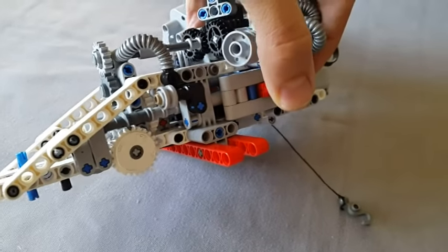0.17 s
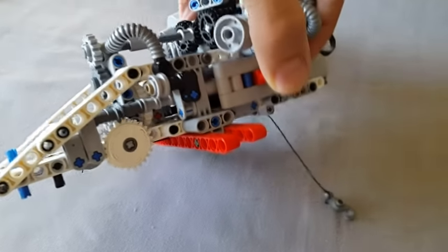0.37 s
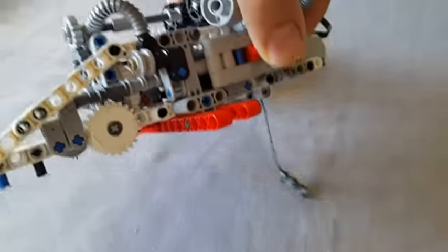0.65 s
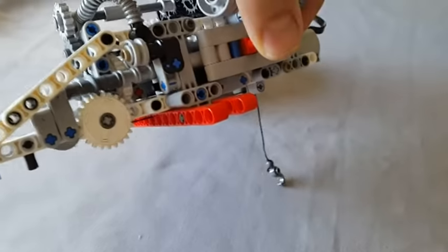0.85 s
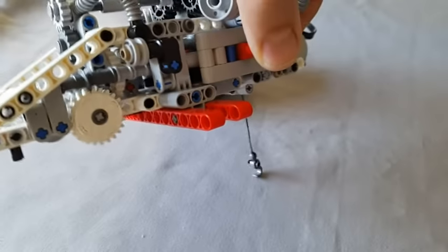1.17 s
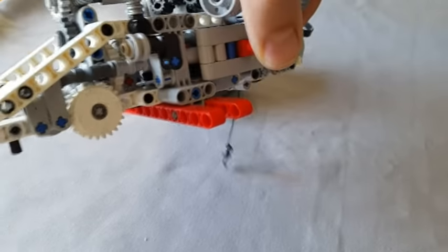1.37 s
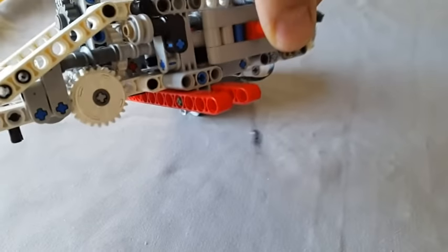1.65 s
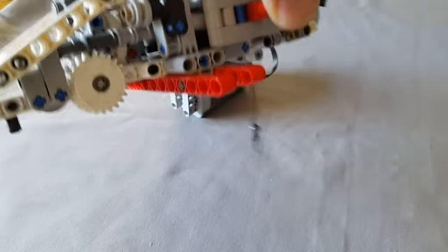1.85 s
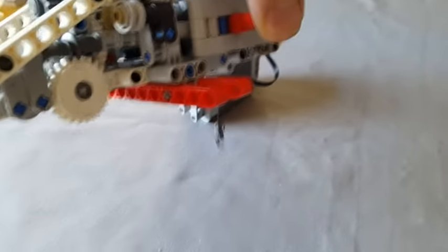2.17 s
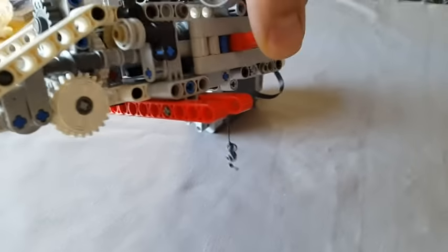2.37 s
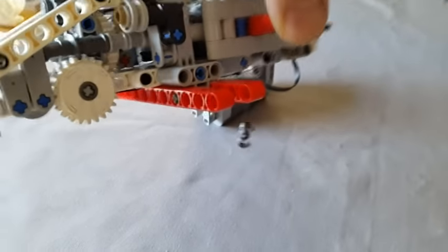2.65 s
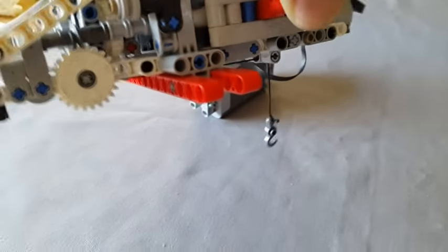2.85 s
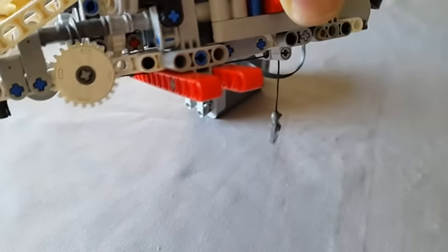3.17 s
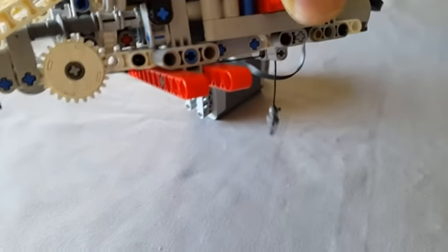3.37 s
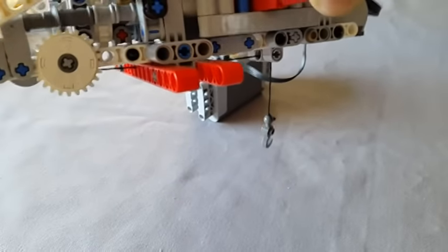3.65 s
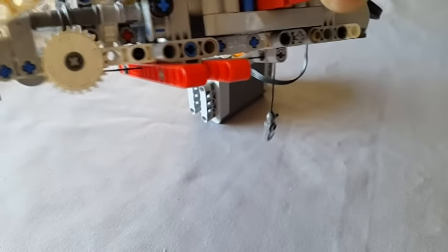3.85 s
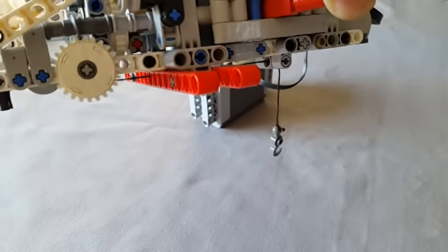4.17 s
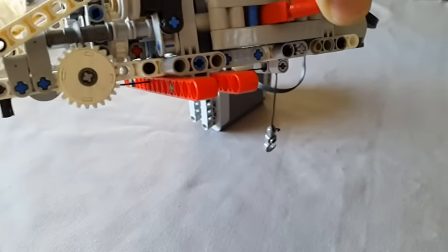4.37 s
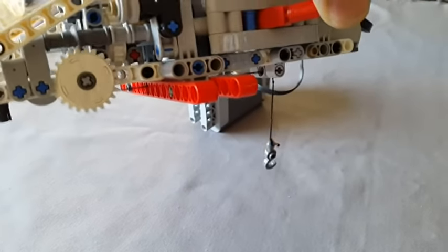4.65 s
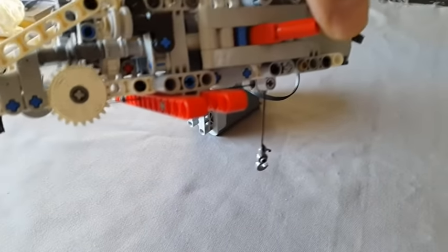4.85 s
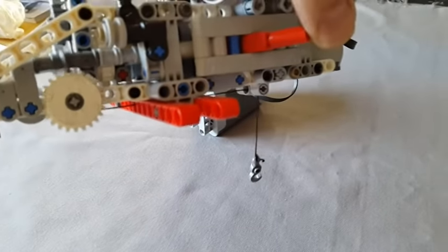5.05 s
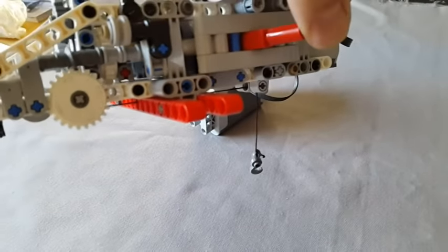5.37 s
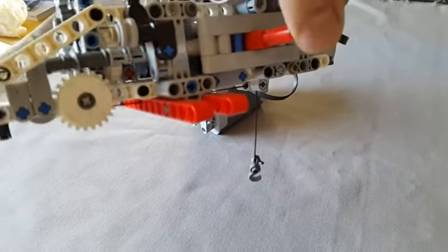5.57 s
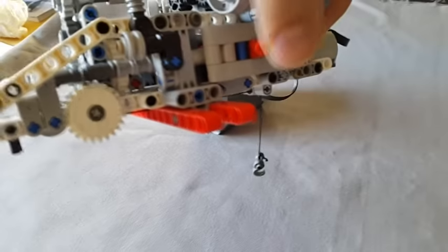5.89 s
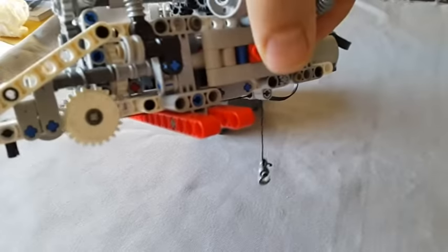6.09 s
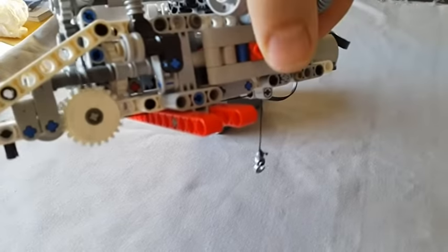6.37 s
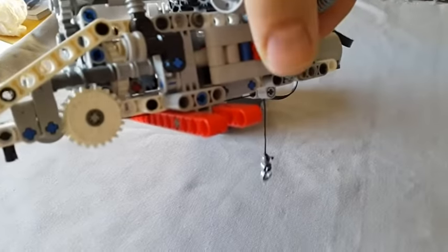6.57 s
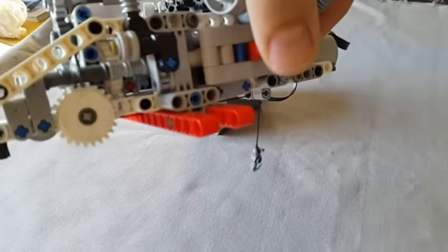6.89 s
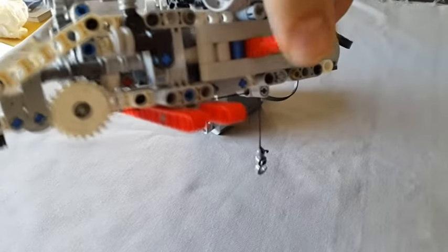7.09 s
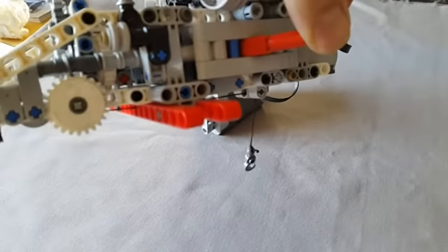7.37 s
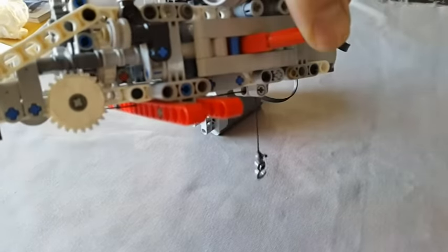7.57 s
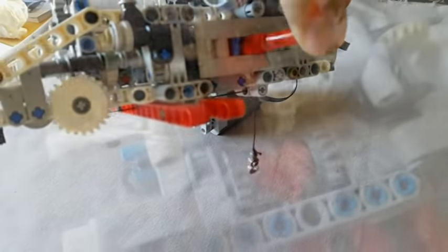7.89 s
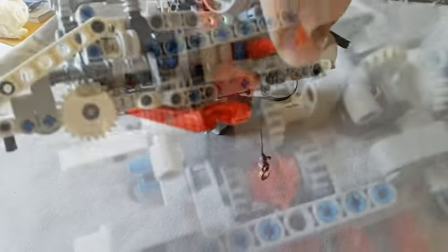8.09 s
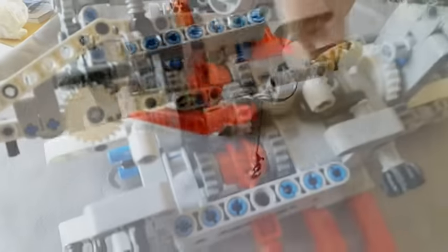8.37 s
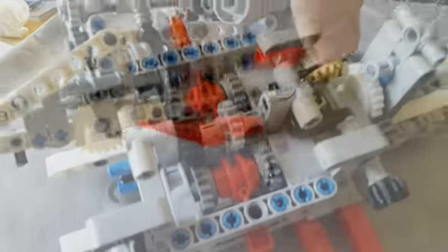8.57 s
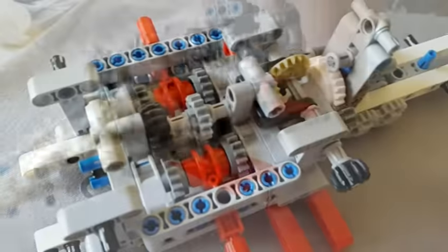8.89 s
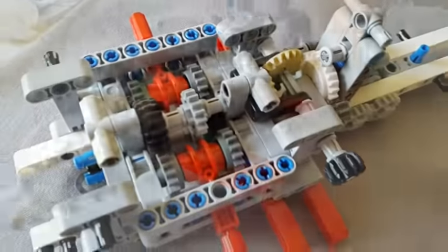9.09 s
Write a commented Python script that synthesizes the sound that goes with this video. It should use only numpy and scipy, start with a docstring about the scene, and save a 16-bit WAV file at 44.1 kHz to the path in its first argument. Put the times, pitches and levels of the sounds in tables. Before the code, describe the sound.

A small electric motor in a hand-held plastic toy crane whines steadily close to the microphone, over a fine rattle and rasp of gears. At first the cable rubs softly as it tightens. The pitch wavers and dips under load, and the gears now and then bind with short, high squeals and small clusters of sharp plastic clicks. The sound fades out at the end, over faint room noise.

```python
"""A small electric motor in a hand-held plastic toy crane winds up a cable, close to the microphone. It whines
at harmonics of its shaft speed, and its brushes tick once a turn. The plastic frame radiates the rattle of the
gears; sliding teeth rasp and the tightening cable rubs. Under load the shaft slows and the gears bind, squeal
and now and then click. Faint room noise and mains hum lie underneath, and the sound fades towards the end."""
import sys
import numpy as np
from scipy import signal
from scipy.fft import rfft, irfft, next_fast_len
from scipy.io import wavfile

SR = 44100
rng = np.random.default_rng(int(sys.argv[2]) if len(sys.argv) > 2 else 0)


def to_wav(sig):
    """Store sig (one row per channel, or 1-D mono) as 16-bit WAV at the path in sys.argv[1].

    Samples outside -1..1 are clipped; the rate is SR.
    """
    pcm = np.clip(np.atleast_2d(sig), -1, 1) * 32767
    pcm = np.round(pcm).astype(np.int16)
    wavfile.write(sys.argv[1], SR, pcm.T)  # frames by channels


N = 407042
TIME = np.arange(N) / SR

# phase between the two microphone ports: (frequency [Hz], lead of the left port [rad])
PORT_PHASE = [(500, 0.5), (1400, 0.5), (2580, 1.04), (3960, -0.5), (5600, 1.14), (7000, 2.5), (9000, 1.5),
              (11200, 1.76), (12300, 2), (13500, 1.5), (15000, 5)]
# moments when the gears bind: (time [s], length [s], slowing [turns/s], binding level [dB])
GEAR_SNAGS = [(0.48, 0.022, 0, -46), (0.76, 0.12, 0, -51), (1.9, 0.08, 0, -46), (2.04, 0.063, 0, -47),
              (2.383, 0.04, 1.36, -47), (2.553, 0.092, 0, -43), (2.728, 0.091, 0.73, -44),
              (2.874, 0.096, 2, -39), (2.982, 0.036, 2.5, -41), (3.634, 0.097, 4.5, -47.5),
              (3.826, 0.09, 6, -42.5), (5.707, 0.072, 6, -39.5), (5.836, 0.039, 2, -40),
              (6.02, 0.086, 2.5, -42.5), (6.16, 0.0549, 2.5, -41.5), (6.22, 0.08, 3, -40),
              (6.355, 0.11, 1.44, -42), (7.32, 0.083, 1.5, -39.5), (7.474, 0.11, 5, -40.5),
              (7.622, 0.085, 3, -45), (8.121, 0.082, 6, -41.5), (8.279, 0.066, 1.5, -42.5)]
# gain as the toy is brought up to the microphone: (time [s], level [dB])
NEARNESS = [(0, -1.5), (1.5, -2), (2.7, -1.8), (3.2, 0.1), (5.2, 0.26), (6.7, -0.6), (7.4, 0.5),
            (8.1, -0.1), (8.8, -1)]


def amp(db):
    """Amplitude ratio of a level in decibels."""
    return 10 ** (np.asarray(db) / 20)


def unit_rms(x):
    """Normalisation to a mean power of 1."""
    return x / np.sqrt(np.mean(abs(x) ** 2) + 1e-20)


def over_time(rows, column=1):
    """Linear interpolation of a time table at every sample."""
    rows = np.asarray(rows)
    return np.interp(TIME, rows[:, 0], rows[:, column])


def at_hz(rows, hz, column=1):
    """Interpolation of a frequency table on a logarithmic axis."""
    rows = np.asarray(rows)
    return np.interp(np.log(hz + 1), np.log(rows[:, 0] + 1), rows[:, column])


def waver(rate_hz):
    """Random modulation: noise of rms 1, low-passed at about rate_hz."""
    size = 16384
    hz = np.fft.rfftfreq(size, TIME[-1] / size)
    slow = irfft(rfft(rng.standard_normal(size)) / (1 + (hz / rate_hz) ** 2))
    return unit_rms(np.interp(TIME, np.linspace(0, TIME[-1], size), slow))


def resonance(hz, centre_hz, half_width_hz):
    """Lorentzian resonance curve, 1 at its centre."""
    return 1 / (1 + ((hz - centre_hz) / half_width_hz) ** 2)


def swell(at_s, length_s, steepness):
    """Gaussian envelope around one moment, 1 at its top."""
    return np.exp(-np.minimum((steepness * (TIME - at_s) / length_s) ** 2, 50))


def fade(start_s=7.58, end_s=9.52):
    """Linear amplitude ramp of the closing fade-out."""
    return np.clip((end_s - TIME) / (end_s - start_s), 0.02, 1)


def ports(pair, gain):
    """Partial coherence: two unrelated signals blend at the microphone ports, coloured by gain(hz)."""
    # likeness of the two ports: (frequency [Hz], coherence [0-1])
    port_coherence = [(40, 0.95), (130, .15), (290, 0.18), (640, 0.74), (1400, 0.75), (3000, 0.27),
                      (7000, 0.19), (15000, 0.18)]
    size = next_fast_len(N)
    hz = np.fft.rfftfreq(size, 1 / SR)
    left, unrelated = rfft(pair, size)
    coherence = np.clip(at_hz(port_coherence, hz), 0, 1)
    blend = coherence * left + np.sqrt(1 - coherence ** 2) * unrelated
    right = blend * np.exp(-1j * at_hz(PORT_PHASE, hz))
    return irfft(np.array([left, right]) * gain(hz), size)[:, :N]


def frame(vibration, low_hz, high_hz):
    """Structural radiation: the plastic frame colours one band of vibration; the result has rms 1."""
    # radiation of the frame: (frequency [Hz], left level [dB], right level [dB])
    radiation = [(350, -20.5, -62), (615, -25.5, -26.5), (917, -18.5, -20), (1420, -13, -10.5),
                 (1950, -6, -5), (2550, -4.5, -11), (2790, -9.5, -15.5), (3080, -8, -9.5),
                 (4250, -7.5, -2.5), (5380, -6, -4.5), (5710, -8.5, 2), (6400, -5.5, -13), (7570, -10, -15),
                 (8000, -15, -15), (9850, -15, -20.5), (12200, -20, -19.5), (16400, -16, -21)]

    def gain(hz):
        band_loss = np.sqrt((1 + (low_hz / (hz + 1)) ** 16) * (1 + (hz / high_hz) ** 16))
        return amp([at_hz(radiation, hz), at_hz(radiation, hz, column=2)]) / band_loss
    return unit_rms(ports(vibration, gain))


def shaft_pace():
    """Load torque slows a motor: the shaft speed [turns/s] follows the load and sags at snags."""
    # pace under the slowly changing load: (time [s], speed [turns/s])
    pace = [(0.0, 155.3), (0.35, 155.5), (0.48, 148.9), (0.84, 148.3), (1.34, 151.8), (1.62, 151.3),
            (1.85, 145.9), (2.05, 146.4), (2.33, 152.4), (2.63, 144.2), (2.96, 147.2), (3.09, 153.8),
            (3.39, 155.3), (4.26, 152.6), (5.5, 155.1), (5.6, 151.2), (6.31, 148.3), (6.68, 152.1),
            (7.15, 155.2), (7.42, 148.8), (7.96, 154.4), (8.04, 152.0), (8.38, 149.2), (8.57, 155.4),
            (9.2, 157.2)]
    sag = sum(slowing * swell(at_s, length_s, steepness=1.5) for at_s, length_s, slowing, _ in GEAR_SNAGS)
    return over_time(pace) - sag


def straining(speed, free_hz=154.2, strained_hz=145.9):
    """Speed droop shows how hard the motor works: 0 running free, 1 straining, 1.3 at most."""
    return np.clip((free_hz - speed) / (free_hz - strained_hz), 0, 1.3)


def tautness():
    """Tension builds as the cable takes up the weight of the hook: 0 slack, 1 carrying it."""
    # tension of the cable: (time [s], tautness [0-1])
    tension = [(0, 0.02), (.36, 0.1), (.6, 0.53), (1.0, 1), (8.2, 1), (8.7, 0.96)]
    return np.clip(over_time(tension), 0, 1)


def binding():
    """Power summation of the snags gives the strength with which the gears bind, as a gain."""
    return np.sqrt(sum((amp(db) * swell(at_s, length_s, steepness=2.3)) ** 2
                       for at_s, length_s, _, db in GEAR_SNAGS))


def partial(cycles, hz, pan_db, rough, rough_hz, drift_db):
    """Modulation: a tone flutters with the play of the gears and drifts sideways as the hand moves."""
    flutter = (1 + rough * (waver(rough_hz) + 1j * waver(rough_hz))) / np.sqrt(1 + 2 * rough ** 2)
    wave = np.exp(2j * np.pi * (cycles + rng.random())) * flutter
    balance = amp(pan_db + drift_db * waver(0.99))
    left = balance * wave.real
    right = (wave * np.exp(-1j * at_hz(PORT_PHASE, hz))).real
    return np.array([left, right]) * np.sqrt(2 / (1 + balance ** 2))


def motor_whine(speed, turns, slack_boost_db=2, aim_db=6, patchy_db=2.5):
    """Harmonic series of the shaft speed; the three-pole rotor favours every third one in the treble."""
    # partials of the whine, in relative levels:
    # (harmonic number, slack level [dB], lifting level [dB], straining level [dB], left over right [dB])
    harmonics = [(1, -80, -76, -79, 2), (3, -68, -73, -76, 2), (4, -70, -71, -79, -4),
                 (5, -67, -63, -68, -1), (6, -61, -71, -72, 0), (7, -61, -59, -64, -1),
                 (8, -55, -62, -71, -3), (9, -60, -53.3, -60, -2), (10, -55, -62, -58, -3),
                 (11, -53.5, -64, -65, 0), (12, -62, -54, -64, -4), (13, -52, -60, -61, -4),
                 (14, -72, -64, -70, -3), (15, -72, -64, -64, -5), (21, -72, -63, -73, 5),
                 (25, -60, -66, -72, -3), (37, -55, -55, -60, -6), (42, -61, -62, -63, 1),
                 (45, -55, -54, -64, 4), (48, -59, -62, -61, 6), (51, -70, -62, -67, 8),
                 (54, -60, -69, -69, 4), (57, -69, -66, -69, 4), (60, -63, -65, -64, 2),
                 (63, -60, -60, -69, -4), (66, -62, -58, -66, 5), (69, -61, -65, -62, 4),
                 (72, -69, -66, -66, 5), (75, -60, -58, -63, 8), (78, -70, -67, -66, 4),
                 (81, -59, -57, -58, 0), (87, -64, -59, -60, -1), (93, -53, -59, -57, -1),
                 (96, -65, -67, -80, -1), (99, -69, -65, -68, 2)]
    # how strongly the motor radiates: (frequency [Hz], level [dB])
    radiation = [(150, -0.5), (600, -1.5), (1080, -1.5), (1400, -2.5), (1950, -1.5), (3200, 6), (7000, 2.5),
                 (10200, 2.5), (11300, 0.5), (12300, -2), (13500, -2), (15300, -1)]
    # turning the toy points one band at the microphone:
    # (time [s], band centre [Hz], level of the high partials [dB])
    aim = [(0.2, 12000, -8.5), (0.7, 10600, -3), (1.5, 11160, -1.5), (1.95, 12800, -1.5), (2.7, 12500, 1),
           (3.15, 11000, -11.5), (4.2, 10700, -4), (5.2, 12580, -4.5), (5.9, 12010, -6), (7.0, 12000, -5.5),
           (8.7, 11500, -7)]
    taut, strain = tautness(), straining(speed)
    aim_hz, treble_db = over_time(aim), over_time(aim, column=2)
    out = np.zeros((2, N))
    for k, slack_db, lift_db, strain_db, pan_db in harmonics:
        hz = k * speed.mean()
        loaded_db = lift_db + strain * (strain_db - lift_db)
        db = at_hz(radiation, hz) + (1 - taut) * (slack_db + slack_boost_db) + taut * loaded_db
        if k < 20:  # the low partials turn rough under strain
            tone = partial(k * turns, hz, pan_db, rough=0.16 + 0.42 * strain, rough_hz=21, drift_db=1.6)
        else:  # short waves beam, so they come and go with every small turn of the toy
            db += treble_db + aim_db * resonance(hz, aim_hz, half_width_hz=1100) + patchy_db * waver(3.0)
            tone = partial(k * turns, hz, pan_db, rough=0.31, rough_hz=30, drift_db=1.8)
        out += amp(db) * tone
    return out


def case_whistle(speed, turns, ring_hz=5630, ring_db=-41):
    """Forced resonance: two harmonics sing in turn as the speed carries them through a motor case mode."""
    # how well the whistle carries as the toy is turned: (time [s], level [dB])
    directivity = [(0.3, -0.5), (0.5, -1), (1.5, -4), (1.95, 3), (2.25, -9), (2.5, -3), (2.9, -3),
                   (3.3, 0.5), (3.5, -5.5), (4.3, -9), (4.9, -10), (5.35, -5), (5.7, -4), (6.2, 0.5),
                   (7.1, -2), (7.6, -4), (8.9, 1.5), (9.1, -2.5)]
    out = np.zeros((2, N))
    for k in (36, 39):
        tone = partial(k * turns, ring_hz, pan_db=-7.5, rough=0.15, rough_hz=35, drift_db=2.0)
        out += resonance(k * speed, ring_hz, half_width_hz=105) * tone
    return amp(ring_db + over_time(directivity)) * out


def brush_ticks(turns, knock_db=-49, slack_db=2.0, decay_turns=0.14, throb_db=0.56, gear_ratio=24):
    """Periodic impact: the brushes tick on the commutator once a turn, harder while the cable is slack."""
    pulses = 0.63 + np.exp(-(turns % 1) / decay_turns)  # decays above a steady floor
    throb = amp(throb_db * np.sin(2 * np.pi * turns / gear_ratio))  # once a turn of the output shaft
    level_db = knock_db + 0.55 * over_time(NEARNESS) + slack_db * (1 - tautness()) + 0.5 * waver(11)
    return amp(level_db) * frame(pulses * throb * rng.standard_normal((2, N)), 390, 1860)


def impacts(per_s, spread_db):
    """Shot noise: tiny random impacts of uneven size, one train for each port."""
    size = amp(spread_db * np.minimum(rng.exponential(1, (2, N)), 4))
    sign = rng.choice([-1, 1], (2, N))
    struck = rng.random((2, N)) < per_s / SR
    return unit_rms(sign * size * struck)


def gear_rattle(bind, rattle_db=-40.5, hiss_db=-42.5, chatter_db=-49.5, slack_db=-4):
    """Impact noise: teeth tap and slide and axles chatter under a randomly fluttering load."""
    near_db, slack = over_time(NEARNESS), 1 - tautness()
    load = amp(0.84 * waver(88) + 0.62 * waver(27))
    rattle = frame(load * impacts(per_s=7000, spread_db=3.0), 2930, 5710)
    hiss = frame(load * impacts(per_s=8000, spread_db=3.0), 6240, 15400)
    chatter = frame(load * impacts(per_s=6000, spread_db=2.5), 2300, 2970)
    rattle_gain = np.hypot(amp(rattle_db - 0.23 * near_db), 0.72 * bind)  # grows when the gears bind
    hiss_gain = amp(hiss_db + 0.8 * near_db)
    chatter_gain = amp(chatter_db + 0.94 * near_db + slack_db * slack + 1.1 * waver(27))
    return rattle_gain * rattle + hiss_gain * hiss + chatter_gain * chatter


def tooth_rasp(slack_hz=5000, taut_hz=3430, half_width_hz=370, rasp_db=-48.5, pull_db=4, bedded_db=-6):
    """Sliding friction: the teeth excite a broad resonance that sinks as the cable tightens."""
    taut = tautness()
    centre_hz = slack_hz + taut * (taut_hz - slack_hz)
    pulling = np.sin(np.pi * taut)  # loudest while the load comes on
    bedded = (1 + np.tanh((TIME - 1.9) / 0.56)) / 2  # fainter once the teeth bed in
    level_db = rasp_db + pull_db * pulling + bedded_db * bedded
    low_pass = signal.butter(2, half_width_hz, fs=SR, output="sos")
    grit = signal.sosfilt(low_pass, rng.standard_normal((2, N)) + 1j * rng.standard_normal((2, N)))
    band = (grit * np.exp(2j * np.pi * np.cumsum(centre_hz) / SR)).real
    return amp(level_db) * unit_rms(ports(band, lambda hz: amp([[-3], [0]])))  # weaker on the left


def cable_and_hand(boom_hz=480, rumble_hz=380):
    """Friction: the cable rubs over its guide and excites a boom resonance; the shifting hand rumbles."""
    # low sounds as the toy is lifted: (time [s], cable level [dB], hand level [dB])
    levels = [(0, -61, -62), (.28, -68, -62.5), (.5, -59, -77), (.8, -64.5, -74), (1.2, -65, -76),
              (1.7, -79, -79), (2.2, -95, -95)]
    cable = ports(rng.standard_normal((2, N)), lambda hz: resonance(hz, boom_hz, half_width_hz=70))
    hand = ports(rng.standard_normal((2, N)), lambda hz: hz / (hz + 150) / (1 + (hz / rumble_hz) ** 6))
    return amp(over_time(levels)) * unit_rms(cable) + amp(over_time(levels, column=2)) * unit_rms(hand)


def room(room_db=-64, hum_db=-79, mains_hz=50):
    """Ambient noise floor: low room noise and a faint, wavering mains hum."""
    # room background: (frequency [Hz], relative spectral density [dB])
    spectrum = [(15, -7), (35, -15), (50, 5.5), (62, -4), (100, 3.5), (170, -0.5), (280, -0.5), (420, -8),
                (800, -8), (3000, -41)]
    noise = unit_rms(ports(rng.standard_normal((2, N)), lambda hz: amp(at_hz(spectrum, hz))))
    mains = np.sqrt(2) * np.sin(2 * np.pi * mains_hz * TIME)
    hum = mains * (1 + 0.33 * waver(4))
    return amp(room_db) * noise * fade() ** 0.49 + amp(hum_db) * hum * fade()


def gear_squeal(speed, turns, bind, squeal_db=-2.0, idle_db=-50, floor=0.22):
    """Friction-excited vibration: a gear pair sings faintly when the shaft is slow, loudly as it binds."""
    # rough partials of the squeal: (multiple of the shaft speed, relative level [dB], width [Hz])
    partials = [(26.2, 3.5, 47), (23.3, -4, 39), (27.62, -5.5, 43), (25.04, -1, 330)]
    squeal = np.zeros((2, N))
    for k, db, width_hz in partials:
        rough = 0.2 + width_hz / 100
        squeal += amp(db) * partial(k * turns, 4600, pan_db=-6.5, rough=rough, rough_hz=width_hz,
                                    drift_db=1.6)
    grip = floor + (1 - floor) * resonance(speed, centre_hz=145, half_width_hz=4.0)
    return np.hypot(amp(idle_db) * grip, amp(squeal_db) * bind) * squeal


def gear_clicks(rise_s=0.0016, decay_s=0.0035, tail_s=0.027, tail_db=-18, snap_db=-0.5):
    """Damped transients: each slip of a tooth briefly shakes the loose plastic parts."""
    # gears catching and slipping: (time [s], treble level [dB], body relative to treble [dB])
    slips = [(2.9951, -31, -5), (3.1476, -32, 2), (3.6516, -31, -7), (3.6717, -25, -4), (3.713, -27, -3),
             (3.886, -24, -6), (5.73, -33, -2), (5.8496, -29.5, 1), (6.0058, -23, -2), (6.0613, -27, -1),
             (7.235, -30, -3), (7.246, -27, -2), (7.2681, -27.5, -3), (7.2935, -20, 0.5),
             (7.3488, -24.5, 1), (7.3647, -32, 0), (7.3762, -25.5, -1), (7.5547, -37, 5), (8.2092, -30, 1)]
    snap_power, body_power = np.zeros(N), np.zeros(N)
    t = np.arange(SR // 10) / SR
    rise = 1 - np.exp(-t / rise_s)
    envelope = rise * (np.exp(-t / decay_s) + amp(tail_db) * np.exp(-t / tail_s))
    for at_s, db, body_db in slips:
        start = round(at_s * SR)
        snap_power[start:start + len(t)] += (amp(db) * envelope) ** 2
        body_power[start:start + len(t)] += (amp(db + body_db) * envelope) ** 2
    snap = frame(rng.standard_normal((2, N)), 6600, 10800)
    body = frame(rng.standard_normal((2, N)), 180, 5300)
    return amp(snap_db) * np.sqrt(snap_power) * snap + np.sqrt(body_power) * body


def scene(motor_db=5.0, jitter=0.000903, wander=0.000802, strain_wander=0.001995, smooth_hz=153.8):
    """Superposition of all sources; one shaft drives the machine and grows unsteady under strain."""
    pace = shaft_pace()
    bind = binding() / fade()  # the snags keep their strength through the fade-out
    speed = pace * (1 + (wander + strain_wander * straining(pace)) * waver(7.07))
    turns = np.cumsum(speed * (1 + jitter * waver(28.4))) / SR
    tones = motor_whine(speed, turns) + case_whistle(speed, turns)
    motor = amp(motor_db + over_time(NEARNESS)) * tones
    smooth_running = amp(-0.45 * np.maximum(pace - smooth_hz, 0))  # quieter gears at top speed
    noise = smooth_running * (brush_ticks(turns) + gear_rattle(bind) + tooth_rasp())
    machine = motor + noise + gear_squeal(speed, turns, bind)
    return fade() * machine + gear_clicks() + cable_and_hand() + room()


def record(dry):
    """Band limiting: a linear-phase low-pass filter removes the highest treble."""
    taps = signal.firwin(511, cutoff=15900, window=("kaiser", 9), fs=SR)
    return signal.oaconvolve(dry, taps[None], "same")


dry = scene()
out = record(dry)
to_wav(out)
```